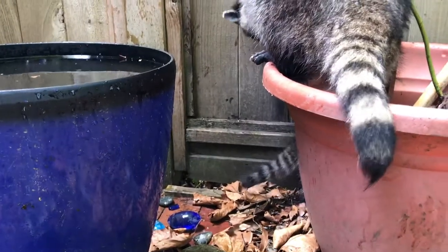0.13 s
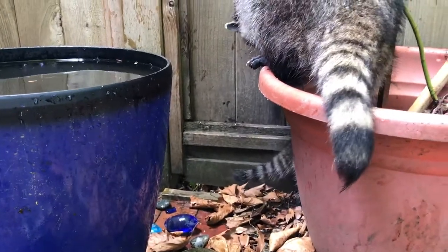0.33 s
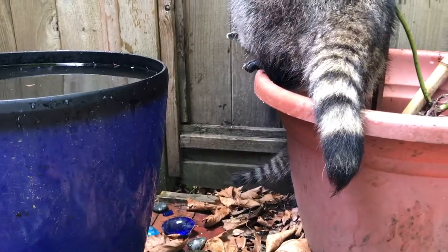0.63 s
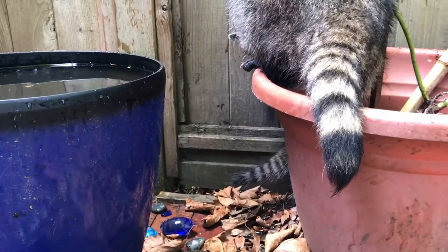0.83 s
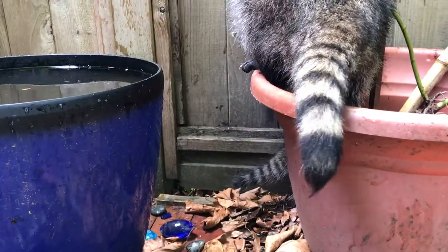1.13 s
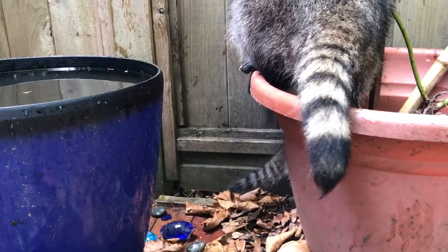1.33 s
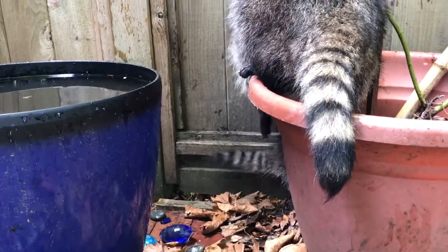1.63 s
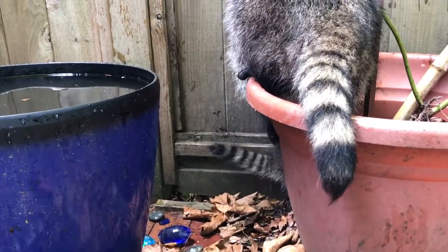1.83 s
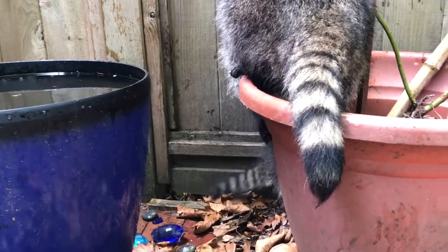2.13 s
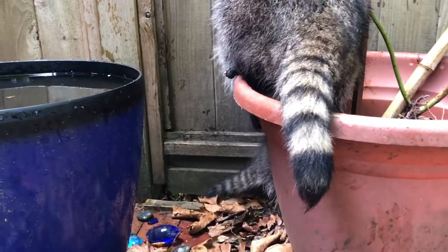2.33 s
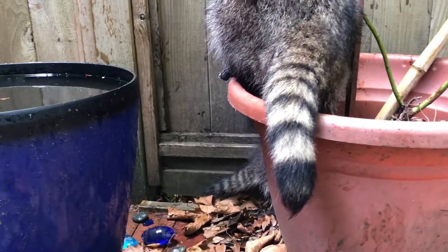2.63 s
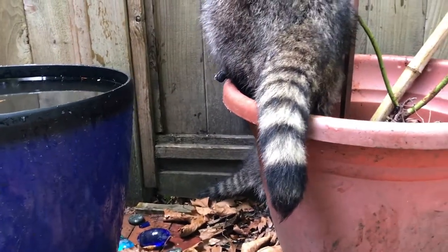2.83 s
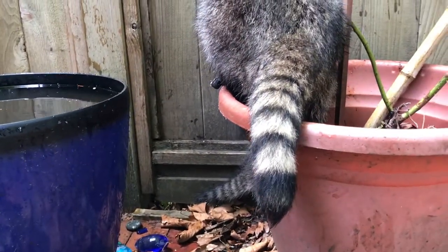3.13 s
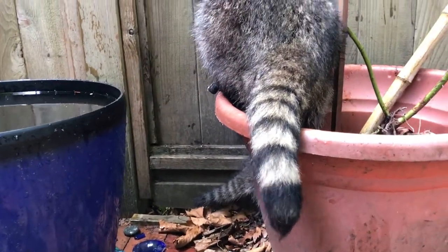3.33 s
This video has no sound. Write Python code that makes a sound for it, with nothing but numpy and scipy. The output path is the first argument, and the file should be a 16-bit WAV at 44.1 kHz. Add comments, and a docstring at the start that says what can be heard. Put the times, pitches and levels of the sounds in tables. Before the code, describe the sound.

Raccoon chittering beside a plastic planter in a quiet yard. Faint scrapes and ticks open; at 1.3-1.5 s five tiny throaty chirps trill rapidly, falling in pitch. A lone chirp with a pot knock comes near 1.85 s. The hardest claw tap cracks at 2.2 s, followed by small ticks and rustling. Six more chirps, mostly rising, run from 3.25 to 3.5 s over low rumble, hum and faint air hiss.

```python
"""Beside a wooden fence, at a plastic planter, raccoons chitter: two quick runs of tiny chirps, 20 to 22
a second, with one lone chirp between. Each chirp is a low chest pulse, a gliding tone and a rasp with formants.
Claws tick, knock and scrape on the pot and in dry leaves, made of coloured grit and short resonances.
Scattered reflections follow; behind lie a low outdoor rumble, a wavering hum and a faint hiss of air."""
import sys
import numpy as np
from scipy import signal
from scipy.fft import rfft, irfft
from scipy.io import wavfile
from scipy.ndimage import uniform_filter1d

SR = 44100
rng = np.random.default_rng(int(sys.argv[2]) if len(sys.argv) > 2 else 0)


def generate_wav(signal):
    """Clip the signal to [-1, 1] and save it as 16-bit WAV at the path in sys.argv[1]."""
    frames = np.transpose(np.atleast_2d(signal))
    scaled = np.clip(frames, -1, 1) * 32767
    pcm = np.round(scaled).astype(np.int16)
    wavfile.write(sys.argv[1], SR, pcm)


N = 154350  # 3.5 s


def amp(db):
    """Decibels to gain."""
    return 10 ** (np.asarray(db) / 20)


def unit(x):
    """Scales to rms 1."""
    return x / np.sqrt(np.mean(x ** 2) + 1e-20)


def add(mix, start_s, sound):
    """Mixes a sound in at its start time."""
    part = mix[max(round(start_s * SR), 0):][:len(sound)]
    part += sound[:len(part)]


def bell(x, half):
    """A smooth swell and fall around x = 0, in time or in frequency."""
    return np.exp(-(x / half) ** 2)


def colour(x, points, tilt_db=0):
    """Shapes the spectrum of x by (Hz, dB) points, tilted by dB per octave, at rms 1."""
    octave = np.log2(np.fft.rfftfreq(len(x), 1 / SR) + 1)
    hz, db = np.transpose(points)
    curve = np.interp(octave, np.log2(hz), db)
    tilt = tilt_db * np.clip(octave, np.log2(hz[0]), np.log2(hz[-1]))
    return unit(irfft(rfft(x) * amp(curve + tilt), len(x)))


def resonate(x, modes):
    """Passes x through parallel resonances, each a peak filter applied twice for steep skirts."""
    total = 0
    for hz, width, db in modes:
        peak = np.hstack(signal.iirpeak(hz, hz / width, SR))
        total = total + amp(db) * signal.sosfilt([peak, peak], x)
    return total


def ring(drive, envelope, modes, width):
    """A burst rings narrow resonances (Hz, dB), each at its own level."""
    burst = drive * envelope
    rings = sum(amp(db) * unit(resonate(burst, [(hz, width, 0)])) for hz, db in modes)
    return rings * np.sqrt(np.mean(envelope ** 2))


def grit(size):
    """Dense little slips of uneven strength over a smooth hiss."""
    slips_per_s, strength_db, smooth = 3200, 6, 0.99
    chance, strength, hiss = rng.random(size), rng.exponential(1, size), rng.standard_normal(size)
    slips = (chance < slips_per_s / SR) * amp(strength_db * np.minimum(strength, 3)) * np.sign(hiss)
    return unit(slips) + smooth * hiss


# The chirps. Each row: centre in seconds, half length in seconds, pitch in Hz, glide in octaves per second,
# tone level in dB, rasp level in dB, chest level in dB, chest lead in seconds, mouth opening from 0 to 1,
# and a list of formants (Hz, dB).
CHIRP_TABLE = [(1.2677, 0.0041, 860, -11, -53.5, -83, -65, 0.0069, .8, []),
               (1.3190, 0.0059, 828, -15.5, -41, -55.5, -51.5, 0.007, 0.66, [(2380, -53), (3000, -57)]),
               (1.3674, 0.006, 798, -14, -47, -56, -50, 0.0064, 0.67, [(2350, -62), (2950, -59.5)]),
               (1.4151, 0.0048, 810, -15, -48, -55, -44, 0.0039, 0.93, [(2370, -57), (3230, -54.5),
               (4280, -60)]), (1.4700, 0.0041, 940, -26, -48, -54, -40.5, 0.0058, 0.46, [(3210, -55)]),
               (1.8639, 0.0025, 925, -4, -39, -48.5, -56.5, 0.0011, 0.19, [(1400, -50)]),
               (3.2451, 0.0047, 644, 2, -40.5, -61, -58.5, 0.0061, 0.05, [(3970, -58)]),
               (3.2871, 0.006, 637, 13, -41, -58, -52, 0.0067, 0.01, [(1400, -59), (2170, -56.5)]),
               (3.3336, 0.0054, 608, 9.5, -39, -64, -52, 0.011, .02, [(1820, -63)]),
               (3.3774, 0.0059, 639, 1.5, -38, -61, -54, 0.0079, 0.01, []),
               (3.4231, 0.0064, 790, 18.5, -49, -59, -49, 0.0088, 0.017, [(1850, -56.5), (3650, -66)]),
               (3.4681, 0.0069, 859, 12.5, -41, -48.5, -44.5, 0.0052, .002, [(1510, -51.5), (2000, -63),
               (2440, -56)])]
# Rasp colour with the mouth open. Each row: resonance in Hz, width in Hz, relative level in dB.
OPEN_MOUTH = [(2980, 770, -3), (4600, 280, 2), (5250, 700, -1.5), (7200, 230, 1), (8480, 400, -1),
              (9440, 610, -6.5), (13000, 4000, -20)]
# Rasp colour with the mouth closed. Each row: resonance in Hz, width in Hz, relative level in dB.
CLOSED_MOUTH = [(884, 460, 15), (1380, 410, 6), (2010, 400, 2)]
# Spectrum of the low flutter. Each row: frequency in Hz, relative density in dB per Hz.
GROWL_SPECTRUM = [(90, -38), (160, 0), (220, 4), (370, -5), (480, -8), (650, -15.5), (1500, -41)]
CHEST_HZ, CHEST_GLIDE_OCT_PER_S, CHEST_HALF_S = 277.7, 69, 0.002
GROWL_DB, GROWL_HALF_S, GROWL_LEAD_S = -4.5, 0.01, 0.0022  # level relative to the chest pulse
RASP_LAG_S, RASP_LENGTH, RASP_PULSING = 0.0021, 1.05, 0.98  # length as a share of the chirp's
FORMANT_LEAD_S, FORMANT_LENGTH, FORMANT_WIDTH_HZ = 0.0014, 0.56, 300
JITTER, OCTAVE_DB = 0.051, -23  # relative rms pitch wobble; second harmonic against the first


def chitter():
    """Each chirp: a chest pulse, a few gliding cycles of voice, and rasp that rings the throat's formants."""
    out, t = np.zeros(N), np.arange(-2048, 2048) / SR
    for s, half, hz, glide, tone_db, rasp_db, chest_db, lead, mouth, formants in CHIRP_TABLE:
        wobble, air, flutter = rng.standard_normal((3, len(t)))

        jitter = 1 + JITTER * unit(uniform_filter1d(wobble, size=60))
        phase = 2 * np.pi * np.cumsum(hz * 2 ** (glide * t) * jitter) / SR
        tone = np.sqrt(2) * (np.sin(phase) + amp(OCTAVE_DB) * np.sin(2 * phase)) * bell(t, half)

        puffs = air * (1 + RASP_PULSING * np.sin(phase))  # breath pulsed by the voice
        bright = np.sqrt(mouth) * unit(resonate(puffs, OPEN_MOUTH))
        muffled = np.sqrt(1 - mouth) * unit(resonate(puffs, CLOSED_MOUTH))
        rasp = unit(bright + muffled) * bell(t - RASP_LAG_S, half * RASP_LENGTH)
        throat_swell = bell(t + FORMANT_LEAD_S, half * FORMANT_LENGTH)
        throat = ring(puffs, throat_swell, formants, FORMANT_WIDTH_HZ)

        early = t + lead  # the rising chest pulse leads the chirp
        chest_phase = 2 * np.pi * np.cumsum(CHEST_HZ * 2 ** (CHEST_GLIDE_OCT_PER_S * early)) / SR
        chest = np.sqrt(2) * np.sin(chest_phase) * bell(early, CHEST_HALF_S)
        growl = colour(flutter, GROWL_SPECTRUM) * bell(t + GROWL_LEAD_S, GROWL_HALF_S)
        chest = chest + amp(GROWL_DB) * growl

        chirp = amp(tone_db) * tone + amp(rasp_db) * rasp + throat + amp(chest_db) * chest
        add(out, s + t[0], chirp)
    return out


# Claw ticks and taps. Each row: start in seconds, level in dB, decay in seconds, brightness in dB per octave,
# pot knock level in dB (6 dB below its peak), and a list of rings (Hz, dB).
TAP_TABLE = [(.574, -61.5, 0.0034, -1, -78, []), (0.824, -58, 0.0043, 8.5, -85, []),
             (1.8372, -52, 0.0053, 1, -48.5, [(330, -47), (14300, -51), (15100, -52)]),
             (1.85, -52.5, 0.0085, 5, -50.5, []), (1.992, -61, 0.0037, 0.5, -85, []),
             (2.2192, -41, 0.0078, -1, -55, [(3950, -55), (5400, -52)]),
             (2.2348, -46, 0.011, -2.5, -55, []), (2.2422, -51, 0.012, -3.5, -53.5, []),
             (2.2812, -54, 0.0033, 9, -72, []), (2.3002, -54, .002, 6, -73, []),
             (2.3112, -58, .002, 6, -83, []), (2.331, -54, 0.01, 0.5, -72, []),
             (2.391, -57, 0.0049, 3, -83, []), (2.464, -55, 0.0074, -4, -60.5, []),
             (3.2003, -53.5, 0.0082, -3, -71, [(2770, -63), (4150, -63.5)])]
# Spectrum of claw grit, for ticks and scrapes. Each row: frequency in Hz, relative density in dB per Hz.
CLAW_SPECTRUM = [(300, -19), (1000, -1), (2000, -3), (3000, 0.5), (4000, -1.5), (5200, -3), (8000, -4.5),
                 (11000, -8.5), (16000, -15)]
# Resonances of the plastic pot. Each row: frequency in Hz, width in Hz, relative level in dB.
POT_MODES = [(310, 150, 2.5), (950, 180, -2), (1370, 360, -2), (1740, 200, -18)]
# The rim ringing on after the hardest tap. Each row: frequency in Hz, level in dB, 60 dB decay in seconds.
RIM_MODES = [(2640, -47.5, 0.066), (3480, -61, 0.089), (4080, -65, 0.064), (4450, -53, .1),
             (5760, -59, 0.088), (6440, -63, 0.051)]
TAP_RISE_S, KNOCK_DECAY_S, RING_WIDTH_HZ = 0.0011, 0.0047, 440
SNAP_S, SNAP_HZ, SNAP_DB, SNAP_DECAY_S = 2.2200, 3040, -27.98, 0.0015  # level before its envelope


def claws():
    """Short gritty ticks knock the pot's resonances; the hardest tap cracks and rings the rim."""
    out, t = np.zeros(N), np.arange(4096) / SR
    rise = np.minimum(t / TAP_RISE_S, 1)
    for s, db, decay, tilt_db, knock_db, rings in TAP_TABLE:
        slips = grit(len(t))
        blow = rise * np.exp(-np.maximum(t - TAP_RISE_S, 0) / decay)
        tick = amp(db) * colour(slips, CLAW_SPECTRUM, tilt_db) * blow
        thud = rng.standard_normal(len(t)) * rise * np.exp(-t / KNOCK_DECAY_S)
        knock = resonate(thud, POT_MODES)
        knock = 2 * amp(knock_db) * knock / abs(knock).max()
        add(out, s, tick + ring(slips, blow, rings, RING_WIDTH_HZ) + knock)
    crack = amp(SNAP_DB) * rise * np.exp(-t / SNAP_DECAY_S) * np.sin(2 * np.pi * SNAP_HZ * t)
    rim = rise * sum(amp(db - 60 * t / t60) * np.sin(2 * np.pi * hz * t) for hz, db, t60 in RIM_MODES)
    add(out, SNAP_S, crack + rim)
    return out


# Scrapes. Each row: centre in seconds, half length in seconds, level in dB, brightness in dB per octave,
# and a list of squeaks (Hz, dB).
SCRAPE_TABLE = [(.113, 0.01, -58.5, 5, [(5000, -63)]), (0.205, .008, -66.5, 6, []),
                (0.871, 0.016, -65, -5.5, []), (1.492, 0.0036, -46.5, 4.5, [(4650, -58)]),
                (1.49, 0.056, -68, 4.5, []), (1.615, 0.055, -62, 3, []), (1.8636, .004, -51.5, 2.5, []),
                (1.874, 0.013, -64, 15, []), (2.151, 0.032, -62, -4, [(6000, -72)]),
                (2.204, 0.053, -63.5, 1.5, []), (2.293, 0.015, -56, 0, []), (2.38, 0.27, -69.5, 0.5, []),
                (2.985, 0.0098, -57.5, 2.5, []), (3.34, 0.13, -72.5, 0, [])]
CATCH_DB, CATCH_HZ, SQUEAK_WIDTH_HZ = 3, 90, 1150  # rms depth and speed of the catching


def scrapes():
    """Paws and fur drag over pot and leaves, catching and slipping unevenly; some strokes squeak faintly."""
    out, t = np.zeros(N), np.arange(N) / SR
    slow = bell(np.fft.rfftfreq(N, 1 / SR), CATCH_HZ)
    catch = unit(irfft(rfft(rng.standard_normal(N)) * slow, N))
    for s, half, db, tilt_db, squeaks in SCRAPE_TABLE:
        slips = grit(N)
        stroke = bell(t - s, half) + 1e-9
        out += amp(db) * stroke * colour(slips, CLAW_SPECTRUM, tilt_db)
        out += ring(slips, stroke, squeaks, SQUEAK_WIDTH_HZ)
    return unit(amp(CATCH_DB * catch)) * out


# Colour of the reflections. Each row: frequency in Hz, relative level in dB.
YARD_COLOUR = [(100, 5), (400, -1.5), (900, -6), (2500, 1), (8000, -0.5), (16000, -3.5)]
YARD_DB, YARD_T60_S, FENCE_DELAY_S = -11, 0.19, 0.0032


def yard(x):
    """Brief scattered reflections from fence, pots and ground, as sparse decaying noise."""
    t = np.arange(SR // 2) / SR
    scatter = rng.standard_normal(len(t)) * (rng.random(len(t)) < .1)
    tail = colour(scatter, YARD_COLOUR) * (t > FENCE_DELAY_S) * amp(-60 * t / YARD_T60_S)
    return signal.fftconvolve(x, tail / np.linalg.norm(tail))[:N]


# Spectrum of the low outdoor rumble. Each row: frequency in Hz, relative density in dB per Hz.
RUMBLE_SPECTRUM = [(20, -35.5), (32, -21.5), (42, -2.5), (54, 0), (68, 0), (82, -8), (100, -5.5),
                   (125, -8.5), (170, -16.5), (250, -25.5), (500, -37), (1500, -86)]
# Spectrum of the open air. Each row: frequency in Hz, relative density in dB per Hz.
AIR_SPECTRUM = [(30, -14), (200, 1.5), (350, 1.5), (550, -3), (950, 1), (1400, -1), (2200, -11),
                (4000, -15.5), (5000, -18.5), (6600, -17), (7500, -22), (9200, -21), (10500, -27.5),
                (12000, -21.5), (16000, -26.5)]
# Slow drift of the levels. Each row: time in seconds, rumble change in dB, hum level in dB, air change in dB.
DRIFT_TABLE = [(0, 3, -59.5, 2), (.3, 0.5, -61.5, 0), (.9, -1.5, -75, 0), (1.3, 1.5, -51, 0.5),
               (1.65, -1.5, -64.5, 1.5), (2.2, -0.5, -57.5, -1), (2.75, 0, -56, -1), (3.5, -1.5, -61.5, 0)]
RUMBLE_DB, AIR_DB = -53, -63.5  # the drift moves around these
HUM_HZ, HUM_WIDTH_HZ = 81.8, 5.9


def background():
    """Coloured noise for low rumble and soft air hiss, and a narrow noise band for a wavering hum."""
    s, *levels = np.transpose(DRIFT_TABLE)
    rumble_gain, hum_gain, air_gain = (amp(np.interp(np.arange(N) / SR, s, db)) for db in levels)
    low, middle, high = rng.standard_normal((3, N))
    rumble = amp(RUMBLE_DB) * rumble_gain * colour(low, RUMBLE_SPECTRUM)
    hum_band = bell(np.fft.rfftfreq(N, 1 / SR) - HUM_HZ, HUM_WIDTH_HZ)
    hum = hum_gain * unit(irfft(rfft(middle) * hum_band, N))
    air = amp(AIR_DB) * air_gain * colour(high, AIR_SPECTRUM)
    return rumble + hum + air


def scene():
    """The animals, their reflections and the outdoor background."""
    animals = chitter() + claws() + scrapes()
    return (animals + amp(YARD_DB) * yard(animals) + background())[None]


def record(dry):
    """The recorder's band limit: a steep low-pass at 15950 Hz."""
    low_pass = signal.firwin(511, 15950, window=("kaiser", 9), fs=SR)
    return signal.oaconvolve(dry, low_pass[None], "same")


dry = scene()
out = record(dry)
generate_wav(out)
```